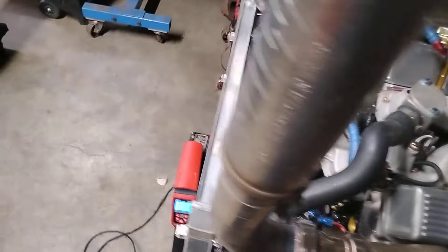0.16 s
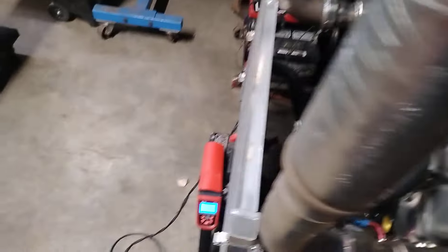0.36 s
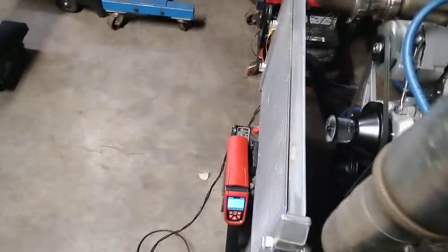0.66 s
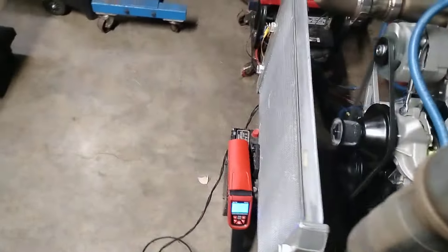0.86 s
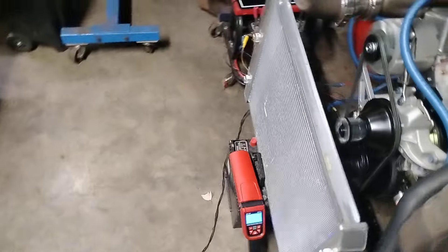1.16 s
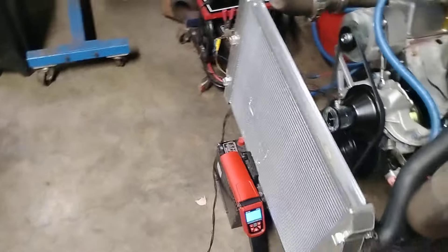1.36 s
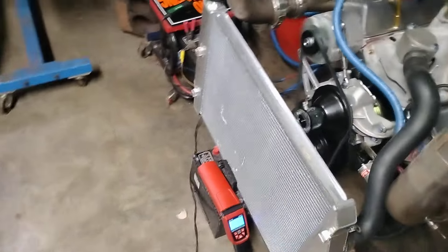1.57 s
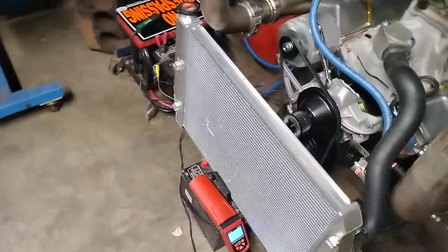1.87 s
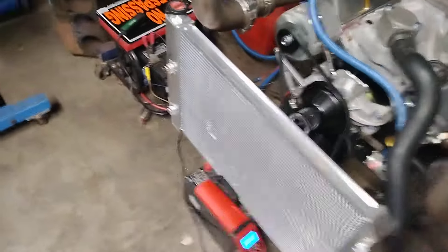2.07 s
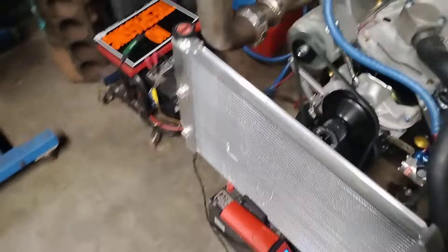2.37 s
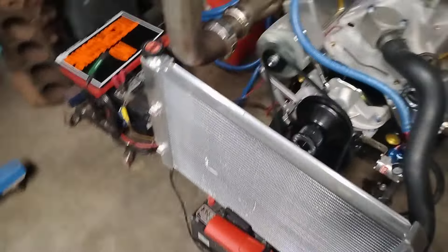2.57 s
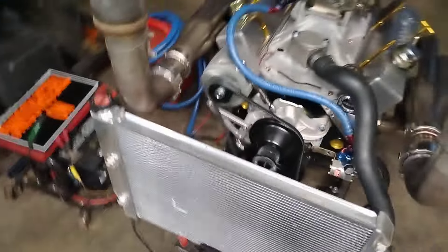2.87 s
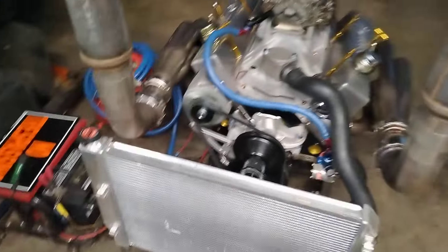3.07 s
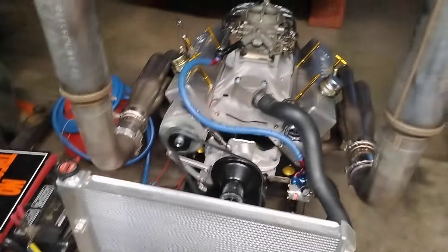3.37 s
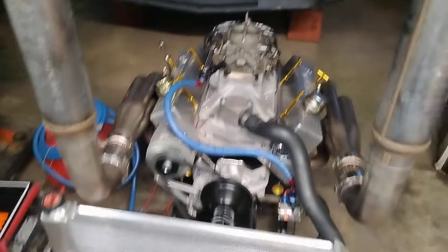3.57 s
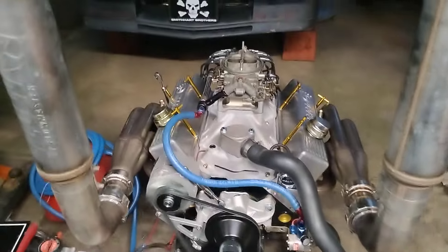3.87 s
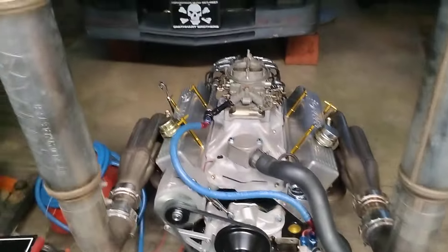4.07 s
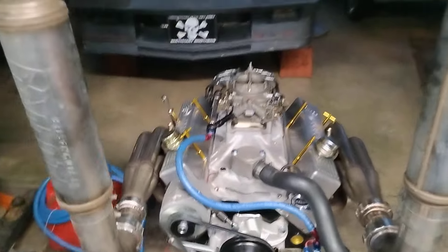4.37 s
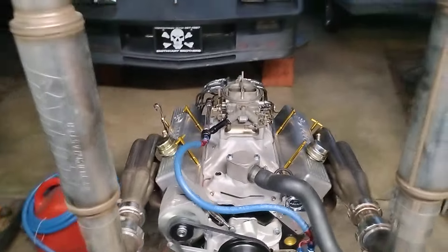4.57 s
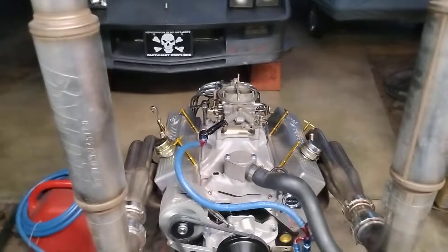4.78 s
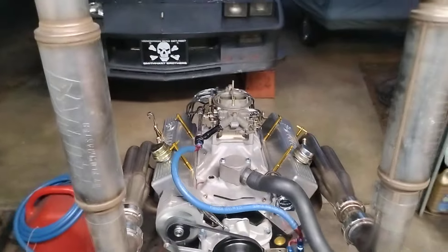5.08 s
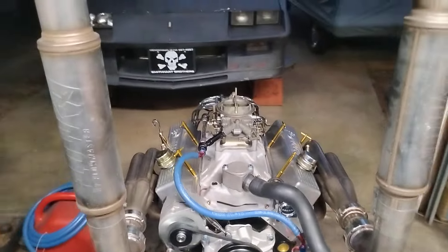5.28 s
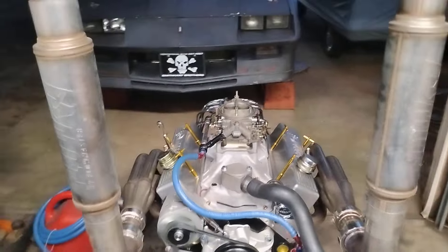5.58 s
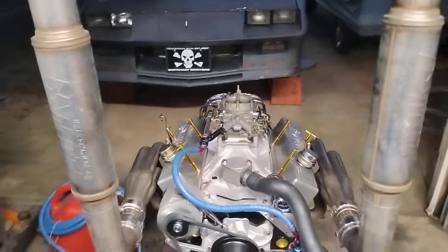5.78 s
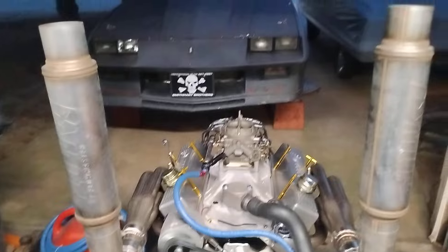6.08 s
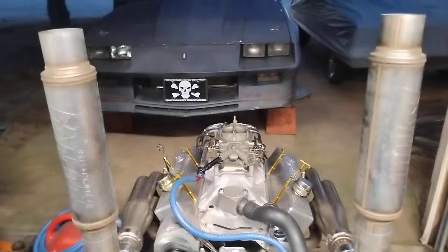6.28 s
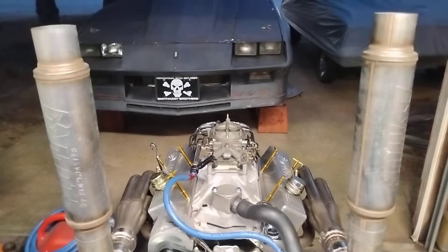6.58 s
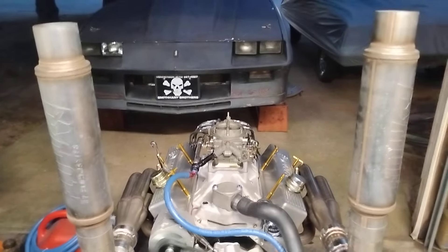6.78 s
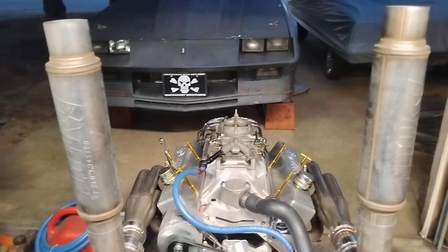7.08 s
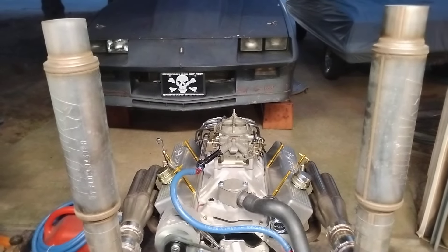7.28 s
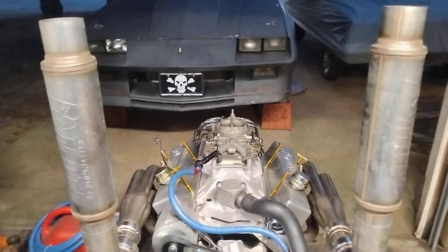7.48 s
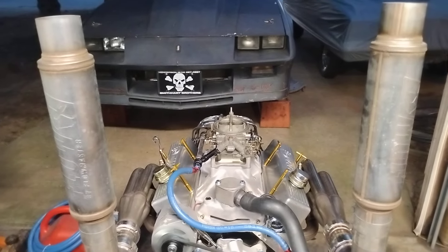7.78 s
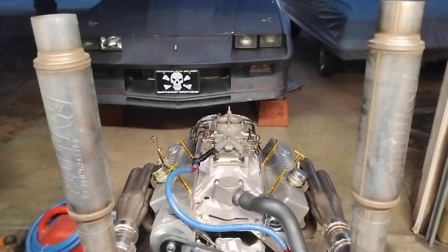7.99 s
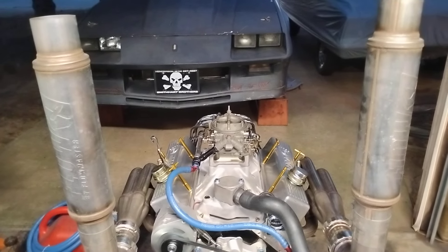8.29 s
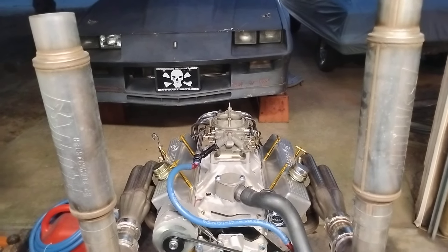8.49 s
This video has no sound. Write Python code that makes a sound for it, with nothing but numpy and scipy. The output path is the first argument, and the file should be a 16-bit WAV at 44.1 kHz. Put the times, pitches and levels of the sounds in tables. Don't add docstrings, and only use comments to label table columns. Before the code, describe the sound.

A V8 with a lumpy cam idles loudly throughout, in a closed garage. From 0 to 2 s the phone is right beside one exhaust pipe: heavy, boomy rumble, with uneven strong pops 0.04 to 0.1 s apart and weak firings muttering between. Each pop is a low push echoing in its pipe, a slower muffler boom near 177 Hz, a hollow ringing crack around 600 to 1000 Hz and a quick puff of hiss. From 2 to 4 s the microphone walks round to the front; the steady rumble eases and gas jets become brighter and sharper. From 4 to 6 s both pipes face the listener, popping more regularly and hissing strongly. From 6 to 8.65 s, a step back, the loping idle continues with slightly more ragged gaps, and stops only at the cut. Bass is centered, treble wide, peaks softly overloaded.

```python
import sys
import numpy as np
from scipy import signal
from scipy.fft import rfft, irfft, next_fast_len
from scipy.io import wavfile
from scipy.ndimage import uniform_filter1d

SR = 44100
rng = np.random.default_rng(int(sys.argv[2]) if len(sys.argv) > 2 else 0)


def int16_out(signal):
    q = np.round(np.clip(np.atleast_2d(signal).T, -1, 1) * 32767)
    wavfile.write(sys.argv[1], SR, q.astype(np.int16))


def ratio_of_db(decibels):
    return 10 ** (np.asarray(decibels, float) / 20)


N = 381448


def evened(x):
    return x / np.sqrt(np.mean(x ** 2) + 1e-20)


def read(points, hz):
    f, value = np.transpose(points)
    return np.interp(np.log(hz + 1), np.log(f + 1), value)


def curve(table, column):
    rows = np.array(table)
    return np.interp(np.arange(N) / SR, rows[:, 0], rows[:, column])


def below(x, hz):
    return signal.sosfilt(signal.butter(3, hz, fs=SR, output="sos"), x)


def train(s, size):
    return np.bincount(np.clip((s * SR).astype(int), 0, N - 1), size, N)


def causal(points):
    gain_db = read(points, abs(np.fft.fftfreq(16384, 1 / SR)))
    log_gain = np.log(ratio_of_db(np.maximum(gain_db, -100)))
    pulse = np.fft.ifft(np.exp(np.conj(signal.hilbert(log_gain)))).real[:4096]
    return pulse / np.linalg.norm(pulse)


def turbulence(depth_db, seconds):
    drift = uniform_filter1d(rng.standard_normal(N), max(round(seconds * SR), 2))
    return ratio_of_db(depth_db * evened(drift))


# [t/s, 0 beside one pipe .. 1 in front of both]
PHONE_AWAY = [
    (0, 0.019),
    (1.5, 0.055),
    (3, 0.49),
    (5, 0.98),
    (8.65, 0.96),
]
# [f/Hz, left-right likeness 0..1]
PORT_LIKENESS = [(60, 0.95), (150, 0.98), (380, 0.94), (950, 0.39), (2380, 0.022), (15000, 0.044)]
# [f/Hz, level left minus right/dB]
PORT_LEAN = [(60, -0.5), (950, 0), (3770, 2.5), (15000, 0.5)]


def noise(pair, power):
    size = next_fast_len(N + 4096)
    hz = np.fft.rfftfreq(size, 1 / SR)
    away = np.clip(curve(PHONE_AWAY, 1), 0, 1)
    gas = rng.standard_normal((3, N)) * np.sqrt(power)
    near = rfft(gas * np.sqrt(1 - away), size) * rfft(causal(pair[0]), size)
    front = rfft(gas * np.sqrt(away), size) * rfft(causal(pair[1]), size)
    z = near + front
    same = np.clip(read(PORT_LIKENESS, hz), 0, 1)
    lean = read(PORT_LEAN, hz) / 2
    ports = np.sqrt(same) * z[0] + np.sqrt(1 - same) * z[1:]
    return irfft(ports * ratio_of_db([lean, -lean]), size)[:, :N]


# [t/s, level/dB]
PIPE_TRIPS = [
    (.004, 1.5),
    (.018, -7),
    (0.032, -11),
    (0.046, -6),
]


def puffs(s, db, rise, quick, slow, tail_db, echo_db):
    t = np.arange(SR // 6) / SR
    wave = (1 - np.exp(-t / rise)) * np.exp(-t / quick)
    second = np.roll(wave, round((PIPE_TRIPS[1][0] - PIPE_TRIPS[0][0]) * SR))
    tail = (1 - np.exp(-t / 0.005)) * np.exp(-t / slow)
    shape = wave + ratio_of_db(2 * echo_db) * second + ratio_of_db(2 * tail_db) * tail
    return abs(signal.oaconvolve(train(s, ratio_of_db(2 * db)), shape)[:N])


def waves(rows, s, db, gain_db):
    strong = len(POPS)
    when, level_db = np.transpose(rows)
    return np.r_[when, s[strong:]], np.r_[level_db + gain_db, db[strong:]]


# [t/s, low rumble level/dB, clatter level/dB, hiss level/dB]
ENGINE_BED = [(0.0, -7.5, -20.5, -28.5), (0.55, -11.5, -25.5, -32), (2.7, -14, -26, -29.5),
              (3.39, -15.5, -23.5, -28.5), (6.63, -16.5, -24, -25.5), (8.0, -13.5, -26, -25.5),
              (8.65, -18, -22, -26)]
# [f/Hz, level/dB per Hz]
RUMBLE_SPECTRA = [
    [(30, -35), (54, -20.5), (102, -3.5), (139, -5.5), (173, 1), (281, -23), (320, -19.5), (420, -31.5), (700, -120)],
    [(30, -53.5), (47, -25), (64, -3), (145, -4.5), (178, 1.5), (226, -15), (320, -18.5), (420, -25), (700, -120)],
]


def rumble(s, push_db):
    surge = puffs(s, push_db + 15.5, 0.0057, .025, 1, -60, 0)
    bed = ratio_of_db(2 * (curve(ENGINE_BED, 1) - 6.5))
    return noise(RUMBLE_SPECTRA, bed * turbulence(1.86, 0.044) * (1 + surge))


# [t/s, level/dB]
JETS_BESIDE = [(0.0293, -18.5), (0.0697, -19.5), (0.1191, -25), (0.2095, -18), (0.2563, -17.5),
               (0.3027, -23), (0.3451, -21), (0.3845, -23), (0.4269, -34), (0.4618, -25), (0.5546, -21),
               (0.6499, -19), (0.6938, -19.5), (0.7342, -21.5), (0.822, -22.5), (0.8994, -19),
               (0.9971, -25), (1.0525, -19), (1.0819, -23), (1.1792, -25), (1.2246, -25), (1.2665, -29),
               (1.3603, -17.5), (1.4047, -16), (1.4416, -18), (1.5314, -23), (1.6277, -19), (1.7235, -16),
               (1.8093, -19.5), (1.8911, -21), (1.999, -19), (2.0966, -18.5), (2.175, -15), (2.2633, -19),
               (2.3655, -23), (2.459, -20.5), (2.539, -19.5), (2.623, -17.5), (2.7307, -19), (2.7626, -24),
               (2.822, -16), (2.898, -19)]
JETS_AHEAD = [(2.9753, -18), (3.064, -19), (3.171, -18.5), (3.2082, -16), (3.2511, -16), (3.338, -18),
              (3.4134, -14.5), (3.5058, -14), (3.566, -16.5), (3.6113, -16), (3.6572, -20), (3.7036, -19.5),
              (3.8, -17), (3.88, -14.5), (3.9032, -22), (3.9855, -15.5), (4.062, -13), (4.163, -16.5),
              (4.2415, -12), (4.3397, -18), (4.383, -21), (4.416, -12.5), (4.5188, -16), (4.596, -13),
              (4.6629, -19), (4.695, -16.5), (4.7697, -17.5), (4.861, -14), (4.9536, -10.5), (5.0424, -12),
              (5.1286, -13), (5.214, -13), (5.301, -13), (5.3874, -13), (5.475, -12.5), (5.564, -11.5),
              (5.659, -11.5), (5.756, -12.5), (5.843, -12)]
JETS_BACK = [(5.9528, -15), (6.028, -14), (6.123, -13), (6.18, -15), (6.305, -17), (6.3965, -14.5),
             (6.476, -14.5), (6.5359, -25), (6.5623, -13.5), (6.652, -17.5), (6.744, -14.5),
             (6.8402, -16.5), (6.92, -12), (7.0048, -18), (7.0722, -26), (7.0961, -13.5), (7.201, -19.5),
             (7.2766, -12), (7.367, -12.5), (7.4304, -28), (7.4623, -13.5), (7.6528, -18), (7.722, -12.5),
             (7.817, -15.5), (7.8606, -16.5), (7.9126, -13.5), (7.9996, -19), (8.0719, -13.5),
             (8.1068, -26), (8.1602, -18), (8.262, -15.5), (8.3562, -17), (8.438, -12.5), (8.5299, -14),
             (8.6416, -15)]
JETS_MORE = [(5.749, -16), (5.929, -27), (6.211, -11.5), (7.353, -38), (7.524, -19), (7.554, -16.5),
             (8.345, -35), (8.624, -24)]


def jets(s, hiss_db):
    return waves(JETS_BESIDE + JETS_AHEAD + JETS_BACK + JETS_MORE, s, hiss_db, -7.)


# [f/Hz, level/dB per Hz]
HISS_SPECTRA = [
    [(4710, -17), (8000, -8), (8700, -17), (9600, -2.5), (11900, 6.5), (13700, 3.5), (14200, -16)],
    [(4710, -29), (8000, -4.5), (9920, -2.5), (12400, 5), (13700, 5), (14200, -7)],
]


def hiss(jet_s, jet_db):
    power = puffs(jet_s - .003, jet_db + 0.58, 0.0082, 0.0077, 0.013, -1.1, -6.0)
    power = power + ratio_of_db(2 * (curve(ENGINE_BED, 3) - 14.5))
    return noise(HISS_SPECTRA, power * turbulence(4.4, 0.0043))


# [f/Hz, level/dB per Hz]
RASP_SPECTRA = [
    [(880, -18.5), (1500, 7), (1540, -12), (1680, 2.5), (2290, -2), (2820, -6), (3190, -6), (3410, -13.5), (4330, -18), (5580, -11), (8500, -16), (11000, -47)],
    [(880, -36.5), (1500, 5.5), (1590, -17), (1710, -6), (1880, 0), (2110, 0.5), (2880, -6), (3500, -14.5), (4050, -15.5), (4400, -10), (5150, -11), (5900, -6), (7200, -3.5), (8500, -30), (11000, -5), (18700, -120)],
]


def rasp(jet_s, jet_db, rap_s, rap_db):
    power = puffs(jet_s - .002, jet_db - 12.0, 0.00051, 0.0088, 0.0093, -1.1, -2.0)
    power = power + ratio_of_db(2 * (curve(ENGINE_BED, 3) - 13.5))
    power = power + puffs(rap_s, rap_db - 30.0, 0.001, 0.0048, 0.006, -1.5, -18.)
    return noise(RASP_SPECTRA, power * turbulence(4.74, 0.005))


# [t/s, level/dB]
RAPS_BESIDE = [(0.028, -14), (0.071, -6.5), (0.111, -20), (0.18, -36), (0.209, -18), (0.252, -17),
               (0.31, -20.5), (0.341, -18), (0.38, -9), (0.422, -16), (0.459, -15.5), (0.552, -17),
               (0.646, -10.5), (0.729, -12.5), (0.818, -16.5), (0.9, -16), (0.972, -20), (1.048, -15),
               (1.133, -21), (1.177, -20), (1.217, -18), (1.265, -30), (1.282, -27), (1.358, -13.5),
               (1.4, -15), (1.453, -16.5), (1.524, -18), (1.624, -28), (1.637, -18), (1.671, -18.5),
               (1.718, -12.5), (1.795, -26), (1.883, -20), (1.895, -17), (1.96, -36), (1.995, -17.5),
               (2.072, -22), (2.092, -14), (2.169, -22), (2.181, -14), (2.259, -16), (2.271, -15.5),
               (2.364, -23.5), (2.417, -30), (2.435, -23), (2.455, -13), (2.532, -16), (2.622, -9.5),
               (2.71, -25), (2.729, -16.5), (2.816, -13), (2.888, -17), (2.917, -12.5)]
RAPS_AHEAD = [(2.973, -11), (3.043, -21), (3.06, -16), (3.159, -16), (3.205, -12.5), (3.245, -13.5),
              (3.333, -15.5), (3.409, -14), (3.427, -19.5), (3.5, -16.5), (3.56, -18.5), (3.606, -17.5),
              (3.65, -25), (3.698, -20.5), (3.796, -13.5), (3.874, -15.5), (3.894, -15.5), (3.94, -38),
              (3.952, -40), (3.98, -14), (4.029, -25), (4.06, -14), (4.158, -21), (4.235, -16),
              (4.251, -12), (4.336, -16), (4.414, -12), (4.464, -26), (4.486, -22), (4.515, -17.5),
              (4.56, -25), (4.592, -13.5), (4.651, -27), (4.664, -17), (4.768, -15), (4.844, -24),
              (4.856, -13.5), (4.948, -11.5), (5.036, -16), (5.051, -14.5), (5.126, -12), (5.208, -15),
              (5.295, -17.5), (5.311, -13.5), (5.382, -15), (5.396, -21), (5.473, -12.5), (5.559, -16),
              (5.582, -23), (5.653, -12), (5.744, -12), (5.836, -13.5)]
RAPS_BACK = [(5.924, -22), (5.94, -17), (5.989, -25), (6.012, -27), (6.024, -14.5), (6.119, -11.5),
             (6.178, -15), (6.207, -10), (6.262, -22), (6.301, -15.5), (6.376, -24), (6.393, -15),
             (6.47, -18), (6.486, -20), (6.56, -14), (6.615, -26), (6.643, -16), (6.736, -10.5),
             (6.823, -24), (6.837, -15), (6.916, -12), (7.001, -21), (7.058, -24), (7.091, -11.5),
             (7.198, -20), (7.273, -14), (7.288, -20), (7.347, -26), (7.362, -15.5), (7.456, -15),
             (7.521, -18.5), (7.551, -16.5), (7.565, -16.5), (7.635, -33), (7.647, -16.5), (7.719, -17),
             (7.752, -24), (7.811, -15.5), (7.856, -18.5), (7.9, -14.5), (7.994, -16.5), (7.995, -20),
             (8.065, -15), (8.156, -19.5), (8.236, -28), (8.249, -18.5), (8.264, -16), (8.295, -24),
             (8.343, -18), (8.364, -16), (8.434, -11.5), (8.524, -14.5), (8.605, -32), (8.622, -18)]
RAPS_MORE = [(.689, -17.5), (1.003, -19.5), (1.809, -16), (2.55, -20), (2.76, -18), (5.228, -19),
             (5.491, -23), (5.76, -22), (5.856, -21)]


def raps(s, crack_db):
    return waves(RAPS_BESIDE + RAPS_AHEAD + RAPS_BACK + RAPS_MORE, s, crack_db, 3.87)


# [f/Hz, level/dB per Hz]
CRACK_SPECTRA = [
    [(150, -23.5), (260, -6.5), (297, -17), (364, -2), (410, 2.5), (451, 1), (503, -8), (553, 2), (657, -21), (716, -8), (800, -21), (1010, -13), (1340, -14.5), (1530, -30.5), (1700, -28), (2210, -67), (3740, -120)],
    [(150, -41), (260, 0), (281, -15), (334, 1.5), (388, -5.5), (410, -26.5), (433, -2.5), (472, -7.5), (570, -3.5), (610, 3), (638, -5.5), (662, -2), (725, -11.5), (769, 1.5), (810, -8), (879, -0.5), (958, -11), (1060, -15.5), (1700, -16.5), (2210, -52), (3740, -120)],
]


def crack(rap_s, rap_db):
    power = puffs(rap_s, rap_db - 6.5, 0.00011, 0.0045, 0.014, -5.5, -4.5)
    power = power + ratio_of_db(2 * (curve(ENGINE_BED, 2) - 6.5))
    burst = noise(CRACK_SPECTRA, power * turbulence(1.4, 0.0033))
    shell = below(below(burst, 487)[:, ::-1], 488)[:, ::-1]
    return burst - shell + np.roll(shell, round(.014 * SR), axis=1)


OVERTONE, OVERTONE_DB = 1.71, -8.5
PORT_HZ = 1560


def knocks(s, db, hz, rise=0.0026, t60=0.039):
    t = np.arange(SR // 20) / SR
    out = np.zeros((2, N + SR))
    for when, g, f, turn in zip(s, db, hz, rng.standard_normal((len(s), 3))):
        port_phase = f / PORT_HZ * (1 + 0.21 * turn[1]) * np.c_[-1, 1].T
        phase = 2 * np.pi * f * t * (1.04 - 2.7 * t) + turn[0] * np.pi + port_phase
        overtone_gain = ratio_of_db(OVERTONE_DB + 3.4 * turn[2] - 60 * t / 0.036)
        ring = np.sin(phase) + overtone_gain * np.sin(OVERTONE * phase)
        envelope = (1 - np.exp(-t / rise)) * ratio_of_db(g - 60 * t / t60)
        out[:, int(when * SR):][:, :len(t)] += envelope * ring
    return (out + ratio_of_db(-6.0) * np.roll(out, round(.014 * SR), axis=1))[:, :N]


# [f/Hz, width/Hz, level/dB]
BOOM_MODES = [(176.83, 10.7, 2), (197.4, 13, -5.5), (124, 30, -8.5), (63, 13.3, -12.5), (247, 22.4, -13),
              (338, 31, -15.5)]


def booms(s, db):
    t = np.arange(SR // 3) / SR
    ring = np.zeros(len(t))
    for f, width, g in BOOM_MODES:
        swell = t * width * np.exp(-np.pi * width * t)
        ring += ratio_of_db(g) * swell * np.sin(2 * np.pi * f * t)
    return ratio_of_db(11.5) * signal.oaconvolve(train(s, ratio_of_db(db)), ring)[:N]


# [f/Hz, level/dB]
PUSH_SPECTRUM = [(25, -54.5), (42, -19.5), (60, 3.5), (110, 3), (200, -9), (400, -26.5), (900, -31.5),
                 (2000, -72.5)]
ECHO_LOSS_DB = -10
MUFFLED = .6


def pushes(s, db):
    away = np.interp(s, *np.transpose(PHONE_AWAY))
    trips = []
    for k, (late, echo_db) in enumerate(PIPE_TRIPS):
        loss_db = ECHO_LOSS_DB * away * max(k - 1, 0)
        trips.append(train(s + late, ratio_of_db(db + echo_db + loss_db)))
    edge = trips[0] - ratio_of_db(1.5) * below(trips[0], 109)
    muffled = np.clip(MUFFLED * curve(PHONE_AWAY, 1), 0, 1) * edge
    return -ratio_of_db(22.) * signal.oaconvolve(sum(trips) - muffled, causal(PUSH_SPECTRUM))[:N]


# [t/s, bass level left minus right/dB]
BASS_SIDE = [(0, 0), (.5, -1.5), (2, -2), (3, 0.5), (8.65, 0.5)]


def bass(s, push_db, boom_db):
    low = ratio_of_db(3.5) * pushes(s, push_db) + ratio_of_db(1.5) * booms(s, boom_db)
    late = np.roll(low, 70)
    low = low + ratio_of_db(-24.0) * np.array([late, -late])
    return low * ratio_of_db(np.outer([.5, -.5], curve(BASS_SIDE, 1)))


# [t/s, strength level/dB, boom level/dB, ring f/Hz]
POPS_BESIDE = [(.025, -15, -6.5, 762), (.069, -16, -5.5, 945), (0.113, -21, -22, 1040),
               (0.207, -20, -12, 790), (.252, -10, -7, 633), (0.303, -20, -33, 1010),
               (.342, -14.5, -19, 1036), (0.383, -6, -9, 970), (.422, -31, -10.5, 665),
               (.46, -10.5, -14, 1130), (0.551, -9.5, -21, 620), (0.646, -9, -25, 610),
               (0.688, -18, -15, 1200), (.719, -11, -2, 757), (.818, -8, -11, 620), (.898, -9, -23, 620),
               (1.002, -17, -2.5, 754), (1.048, -5.5, -6, 590), (1.133, -19.5, -11, 610),
               (1.178, -22, -12.5, 637), (1.219, -21, -3, 620), (1.266, -28, -10, 630),
               (1.357, -6.5, -15, 613), (1.4, -7, 0, 860), (1.525, -17, -16, 1130), (1.626, -8, -16, 830),
               (1.719, -5.5, -26, 1030), (1.809, -6.5, -9, 884), (1.883, -8.5, -29, 886),
               (1.995, -19, -25, 812)]
POPS_WALKING = [(2.091, -5.5, -15, 746), (2.169, -8.5, -5.5, 870), (2.26, -19, -17, 930),
                (2.365, -17, -19, 630), (2.455, -9, -12.5, 1000), (2.532, -7.5, -6, 700),
                (2.621, -17, -14, 1000), (2.729, -8, -27, 816), (2.815, -11, -17, 795),
                (2.89, -20, -3, 734), (2.916, -12, -8.5, 660), (2.973, -27, -16, 986),
                (3.06, -5.5, -8, 706), (3.16, -16, -11.5, 903), (3.205, -16, -9.5, 800),
                (3.245, -13, -14.5, 740), (3.333, -18, -9.5, 783), (3.41, -16, -13.5, 990),
                (3.501, -9, -11, 780), (3.568, -24, -6.5, 765), (3.606, -27, -20, 730),
                (3.648, -29, -19, 895), (3.698, -10, -34, 880), (3.797, -14, -6, 805),
                (3.879, -18, -10.5, 790), (3.893, -23, -17, 786), (3.981, -13.5, -17, 770),
                (4.03, -31, -31, 766), (4.059, -6.5, -12.5, 856), (4.158, -19, -23, 745)]
POPS_AHEAD = [(4.236, -9, -5, 730), (4.336, -13, -6, 750), (4.382, -13, -29, 674), (4.413, -10, -8, 880),
              (4.519, -10, -20, 676), (4.593, -9.5, -5.5, 600), (4.664, -7, -13.5, 797),
              (4.693, -16, -12.5, 766), (4.769, -16, -9, 850), (4.845, -19, -25, 750),
              (4.862, -15, -10, 760), (4.95, -9, -6.5, 635), (5.037, -17, -27, 790),
              (5.052, -12, -13.5, 765), (5.126, -7.5, -14, 853), (5.213, -14, -8, 608),
              (5.298, -11, -12.5, 756), (5.381, -12, -8, 783), (5.473, -6, -15, 873),
              (5.562, -11, -18, 641), (5.653, -11, -11.5, 620), (5.745, -6, -15.5, 814),
              (5.843, -10, -19, 907), (5.926, -22, -18, 560), (5.952, -17, -36, 604), (6.023, -6, -12, 565),
              (6.118, -7, -14, 832), (6.178, -23, -14, 610), (6.207, -11, -15, 882), (6.305, -21, -33, 836)]
POPS_BACK = [(6.393, -11, -12, 804), (6.471, -7.5, -18, 870), (6.559, -11, -16.5, 910),
             (6.661, -10, -27, 900), (6.739, -10.5, -13.5, 607), (6.838, -10, -20, 905),
             (6.916, -6.5, -32, 850), (7.002, -20, -14.5, 580), (7.093, -6.5, -15, 572),
             (7.197, -28, -11, 878), (7.275, -17, -17, 876), (7.353, -24, -18, 610), (7.427, -20, -17, 753),
             (7.461, -8.5, -16, 604), (7.522, -17, -13, 858), (7.551, -5.5, -25, 870),
             (7.646, -24, -22, 900), (7.721, -23, -15.5, 873), (7.814, -7, -19, 550), (7.861, -9, -14, 769),
             (7.9, -6.5, -13, 803), (7.994, -16, -24, 872), (8.065, -22, -15, 605),
             (8.159, -11.5, -24, 613), (8.262, -6.5, -12.5, 810), (8.344, -16, -21, 804),
             (8.364, -31, -28, 850), (8.432, -8, -20, 903), (8.526, -12, -24, 608), (8.623, -3, -27, 800)]
POPS = POPS_BESIDE + POPS_WALKING + POPS_AHEAD + POPS_BACK
# [level beside/dB, level in front/dB, dB per dB of strength, scatter/dB]
CRACK_LAW = (-18.5, -16.5, 2.5, 1.5)
PUSH_LAW = (-11.5, -14.5, 0.42, 1)
HISS_LAW = (-36.5, -27, 2.5, 4.5)
USUAL_DB = -12
FIRING_S = .0223


def firings(weak_db=-17.0, spread_db=3.0):
    s, strength_db, boom_db, ring_hz = np.transpose(POPS)
    away = np.clip(np.interp(s, *np.transpose(PHONE_AWAY)), 0, 1)
    scatter = rng.standard_normal((len(s), 3)).T
    parts_db = []
    for (near, far, slope, loose), draw in zip((CRACK_LAW, PUSH_LAW, HISS_LAW), scatter):
        parts_db.append(near + (far - near) * away + slope * (strength_db - USUAL_DB) + loose * draw)
    crack_db, push_db, hiss_db = parts_db
    rows = np.transpose([s, crack_db, push_db, boom_db, hiss_db, ring_hz])
    gaps = np.diff(s)
    counts = np.maximum(np.round(gaps / FIRING_S).astype(int), 1)
    chance = rng.standard_normal((len(rows), 8, 3))
    weak = []
    for k, n in enumerate(counts):
        for j in range(1, min(n, 8)):
            late = gaps[k] * j / n + .002 * chance[k, j, 0]
            drop_db = np.full(4, weak_db + spread_db * chance[k, j, 1])
            weak.append(rows[k] + np.r_[late, drop_db, 90 * chance[k, j, 2]])
    return np.vstack([rows, weak]).T


def scene():
    s, crack_db, push_db, boom_db, hiss_db, ring_hz = firings()
    jet_s, jet_db = jets(s, hiss_db)
    rap_s, rap_db = raps(s, crack_db)
    nearest = abs(rap_s[:, None] - s - .005).argmin(axis=1)
    gas = hiss(jet_s, jet_db) + rasp(jet_s, jet_db, rap_s, rap_db) + crack(rap_s, rap_db)
    rings = knocks(rap_s, rap_db - .3, ring_hz[nearest])
    return rumble(s, push_db) + gas + rings + bass(s, push_db, boom_db)


def low_pass(x):
    return signal.sosfilt(signal.butter(12, 15590, fs=SR, output="sos"), x)


def record(dry):
    band = signal.firwin(511, 14400, window=("kaiser", 9), fs=SR)
    mix = signal.oaconvolve(np.tanh(dry), band[None], "same")
    return low_pass(mix)


dry = scene()
out = record(dry)
int16_out(out)
```